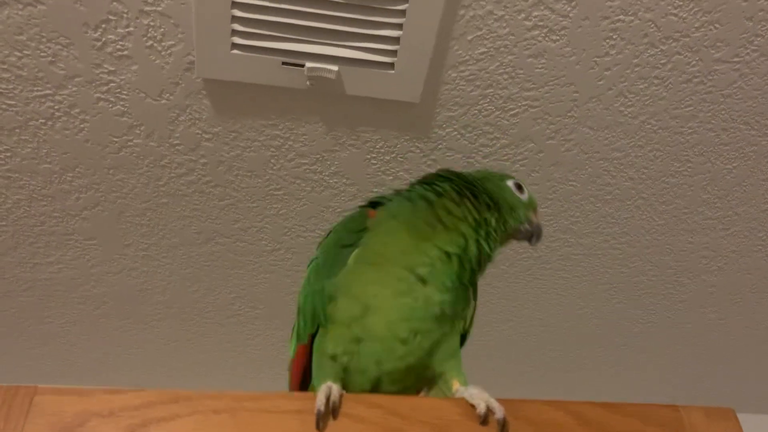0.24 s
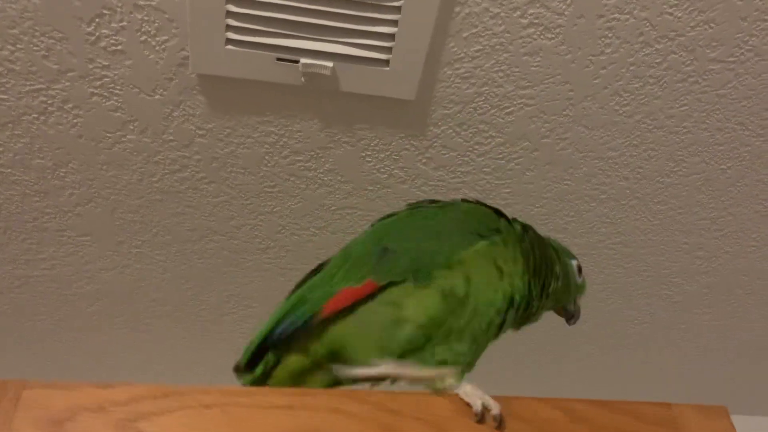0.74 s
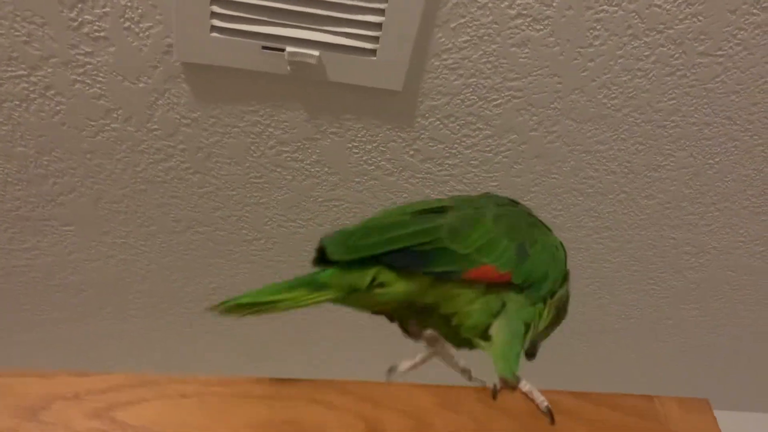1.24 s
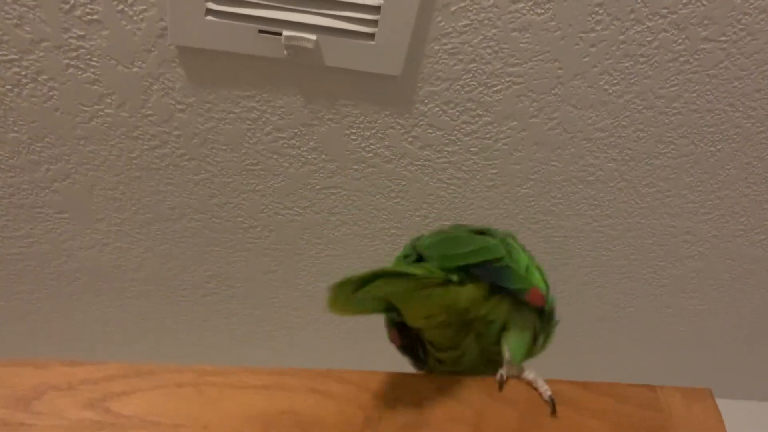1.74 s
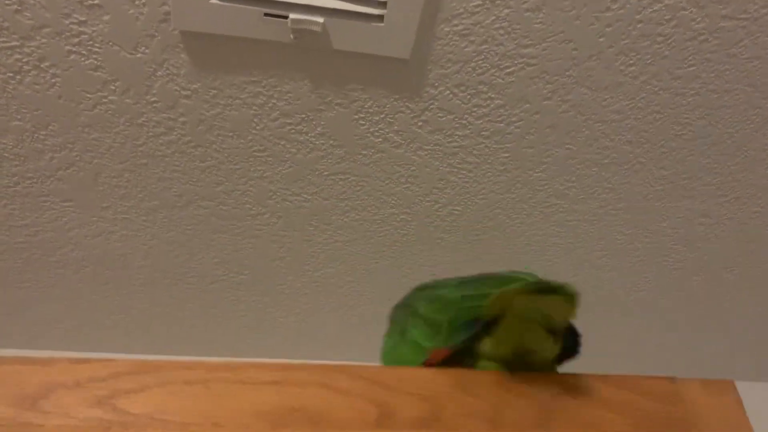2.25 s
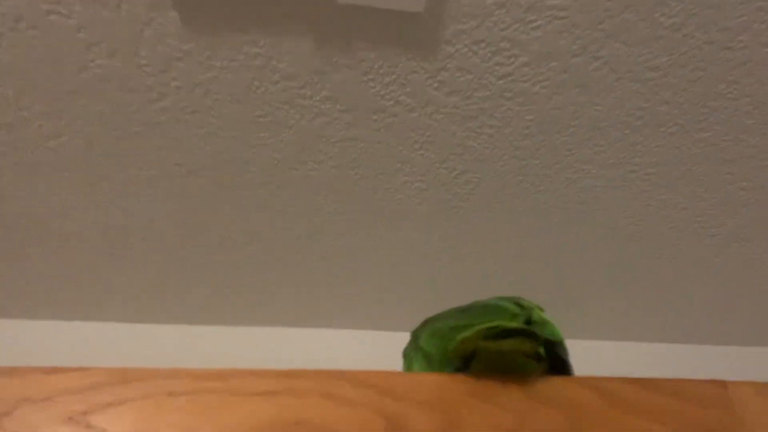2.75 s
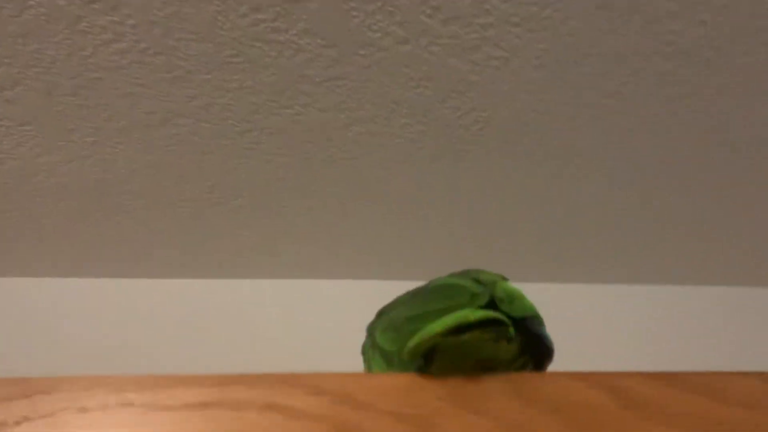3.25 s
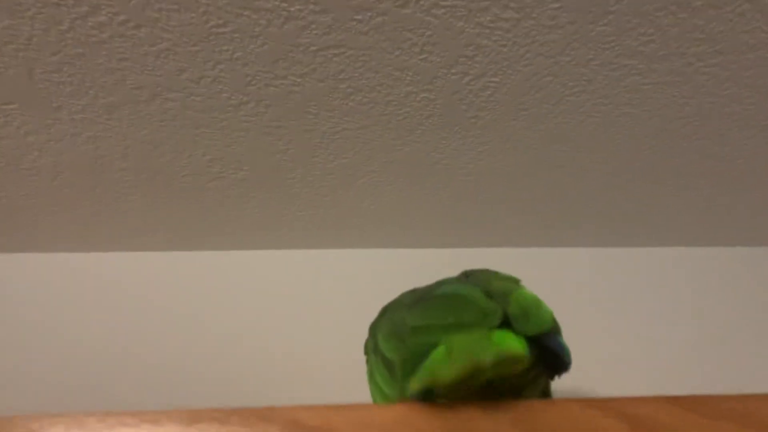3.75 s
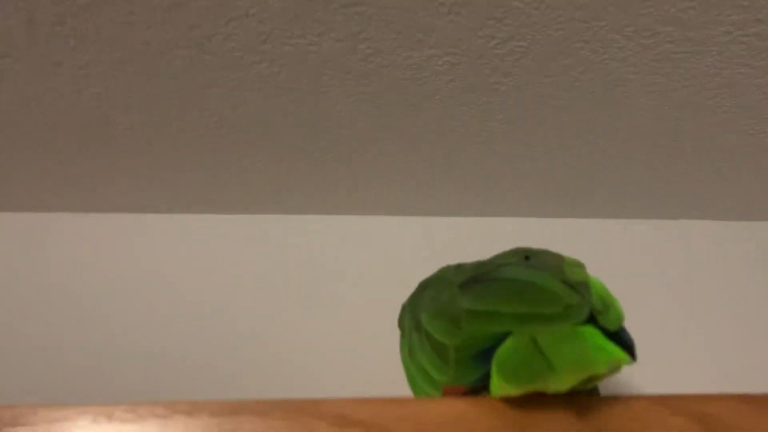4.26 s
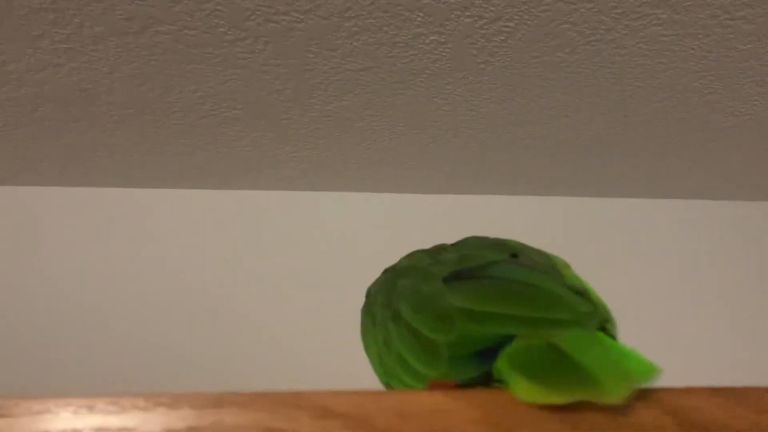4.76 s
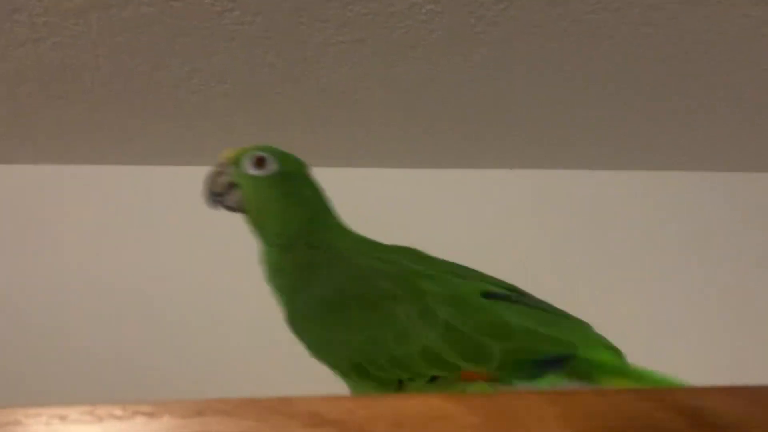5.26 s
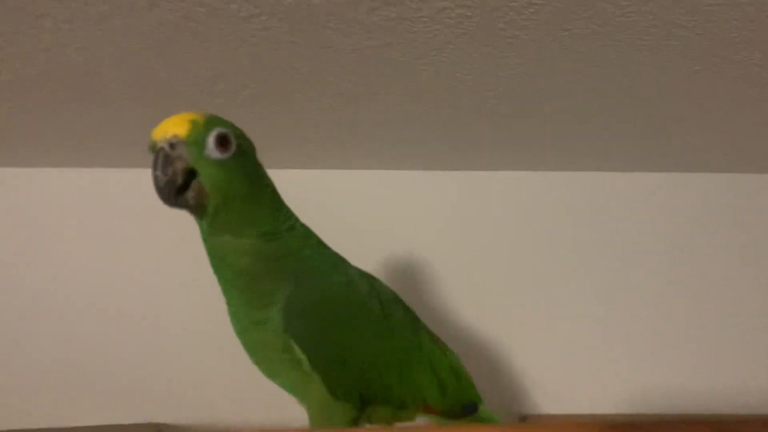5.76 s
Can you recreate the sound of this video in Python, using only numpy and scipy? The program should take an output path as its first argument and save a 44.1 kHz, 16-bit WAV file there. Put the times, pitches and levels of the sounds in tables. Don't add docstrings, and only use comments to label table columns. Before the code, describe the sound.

A low, steady electrical hum and faint airy hiss fill a small quiet room, heard through a close stereo microphone. From 0 to 0.9 s there are only a faint tap and soft feather shifts from a parrot on a wooden ledge. Around 1.0 to 1.3 s come crisp, thin claw clicks with a soft low bump, then light steps and scrapes near 1.5 to 2.0 s. A brighter cluster of ticks falls at 2.2 to 2.6 s. A small knock sounds at 2.94 s, fainter taps follow, a light scuff at 3.5 s, then a clearer hollow double knock at 3.74 s. Things stay nearly still until 4.6 s, when a tap and scrape begin a vigorous turn. From 4.8 to 6.0 s, feathers rustle roughly and continuously, with low thumps, sharp claw clacks near 5.2 and 5.37 s, and a hard tap at 5.55 s; the rustling continues to the end.

```python
import sys
import numpy as np
from scipy import signal
from scipy.fft import rfft, irfft, next_fast_len
from scipy.io import wavfile
from scipy.ndimage import map_coordinates

SR = 44100
rng = np.random.default_rng(int(sys.argv[2]) if len(sys.argv) > 2 else 0)


def inscribe(sig):
    pcm = np.round(np.clip(np.atleast_2d(sig).T, -1, 1) * 32767)
    wavfile.write(sys.argv[1], SR, pcm.astype(np.int16))


def decibels_to_gain(level_db):
    exponent = np.asarray(level_db, float) / 20
    return 10 ** exponent


N = 265658
FFT_LENGTH = next_fast_len(N)
BIN_HZ = np.maximum(np.fft.rfftfreq(FFT_LENGTH, 1 / SR), 1)

# [harmonic_number, level_db]
HUM = [(1, -51.5), (2, -57.5), (3, -67), (4, -82.5), (5, -79), (6, -78), (8, -96.5)]
# [time_s, level_db]
HUM_SWELL = [(0, -1.5), (.6, -2.5), (1.2, -2), (2.1, -1), (2.6, -3), (3.3, -1), (3.9, -2.5), (4.2, -3.5),
             (4.7, -1), (6.02, 1.5)]

AIR = [(25, -100), (45, -92), (80, -83.5), (160, -90.5), (300, -100), (500, -109), (1000, -117),
       (2000, -121), (4000, -126), (7000, -127), (10000, -124), (13000, -124), (15650, -124), (15850, -150)]
RUMBLE = [(20, -45), (36, 2.5), (70, 5.5), (100, 0), (160, -10.5), (260, -21), (400, -35)]
BODY = [(120, -5), (220, -2), (450, -4.5), (900, -11.5), (1300, -18)]
FEATHERS = [(600, -33), (1000, 0.5), (2500, 1), (4000, -4.5), (7600, -11.5), (8300, -33)]
SHEEN = [(7000, -30), (7700, -7), (8700, 0), (10000, -3), (11200, -4.5), (14000, 1), (15650, -3),
         (15850, -40)]
LOW_TICK = [(700, -28), (1100, -13), (1500, -11.5), (2500, -7.5), (3200, -22)]
MID_TICK = [(1900, -27), (2600, 0.5), (4500, -0.5), (7600, -4), (8600, 5)]
HIGH_TICK = [(6800, -30), (7800, -5), (9000, 0), (11000, -2), (14000, 0), (15600, -5), (16000, -22),
             (16700, -32)]

# [centre_s, length_s, level_db, brightness_db]
SHIFTS = [(0.113, 0.075, -81, -0.5), (0.342, 0.049, -78.5, -2.5), (0.647, 0.39, -86.5, 0),
          (0.71, 0.023, -78, -1), (0.87, 0.2, -78.5, 7), (0.917, 0.046, -72, 0.5), (1.11, 0.36, -78, -4),
          (1.28, 0.036, -88, 3), (1.652, 0.12, -79, -3.5), (1.743, 0.19, -88.5, -7.5),
          (1.983, 0.14, -75.5, 1.5), (2.044, 0.15, -80.5, -4.5), (2.396, 0.086, -80.5, -3),
          (2.548, 0.071, -77, 5), (2.884, 0.31, -86, -2), (3.006, 0.12, -90.5, -18),
          (3.23, 0.16, -87.5, -14), (3.38, .1, -90, 8), (3.498, 0.12, -73.5, 0), (3.825, 0.17, -74.5, -3),
          (4.003, 0.057, -80, -1), (4.066, 0.04, -86, -11), (4.164, 0.23, -83.5, 0), (4.26, 0.09, -91, -14)]
# [time_s, level_db, brightness_db]
SWING = [(4.54, -85.5, 1), (4.63, -73.5, 0), (4.7, -64.5, -2.5), (4.78, -60, -8), (4.85, -58, -8.5),
         (4.89, -59.5, -3), (4.93, -59.5, -7), (5.0, -59, 1), (5.12, -57.5, -2), (5.25, -55.5, -0.5),
         (5.34, -62.5, 0.5), (5.45, -59.5, -0.5), (5.53, -59.5, -3), (5.62, -58, 0), (5.7, -61, 6),
         (5.77, -62.5, 2), (5.82, -57.5, 1.5), (5.88, -64, 3), (5.93, -56.5, 6.5), (5.99, -61.5, 2),
         (6.02, -57.5, 4)]
SWING_MEAN_DB = -59
# [centre_s, length_s, level_db]
THUMPS = [(.97, 0.16, -60), (1.13, 0.2, -55), (2.0, 0.12, -60), (2.8, 0.14, -63), (4.3, 0.27, -70),
          (4.84, 0.12, -50.5), (4.97, 0.037, -45.5), (5.1, 0.11, -47.5), (5.16, 0.032, -40),
          (5.22, 0.022, -37.5), (5.36, 0.14, -45), (5.42, 0.017, -43.5), (5.55, 0.024, -73),
          (5.68, 0.027, -70), (5.81, 0.1, -46.5), (5.865, 0.053, -40.5), (6.02, 0.067, -46)]

# [start_s, level_db, wood_db]
CLICKS = [(.9872, -50, 5.5), (1.1588, -58.5, 12), (1.1782, -45.5, 5.5), (1.2078, -40.5, 1.5),
          (1.2543, -53, 7), (2.247, -50, 1), (2.7162, -62.5, -2), (3.379, -73, 16), (3.4907, -52.5, -9),
          (3.5074, -59, -8), (3.5634, -78, 4), (3.9043, -63, -19), (4.0573, -67, -1), (4.332, -67, -15.5),
          (4.878, -72, -4), (5.1975, -42, -9), (5.3688, -43, 1), (5.9505, -50, 0), (1.9875, -73, 3),
          (2.2315, -45, 0), (5.5486, -33, 11)]
# [start_s, level_db, wood_db]
STEPS = [(1.5095, -59.5, 9.5), (1.6025, -63, 7.5), (1.717, -78, 11), (1.8673, -72.5, 7), (1.9415, -69.5, 2),
         (1.951, -72, 1), (1.9714, -78, 17), (1.9866, -62, 7), (2.2103, -46.5, 3), (2.231, -45, 2.5),
         (2.5386, -55.5, 1), (3.4106, -58, 5), (3.5763, -69.5, 10), (3.8283, -66.5, 6.5),
         (4.229, -72.5, -3), (4.9478, -44.5, 4), (5.1744, -39, 5.5), (5.199, -40, 1), (5.313, -57, 13),
         (5.3465, -53, 3), (5.3661, -37.5, 3), (5.5814, -48, 10), (5.6354, -37.5, 0.5), (5.9186, -47, 2.5),
         (5.9504, -41.5, -1)]
# [start_s, level_db, dullness_db]
SCRAPES = [(.1999, -73, -11), (1.2294, -61, 1), (1.5584, -61.5, 5), (2.248, -52, -2), (2.27, -61, -5),
           (1.525, -66, 6), (2.425, -71, -5), (2.4454, -76, -2), (2.5604, -59.5, -3), (2.582, -64, -3),
           (3.4297, -60, 14.5), (3.4544, -81, 8), (4.1554, -67.5, -2), (4.6044, -57, 2.5),
           (4.631, -57.5, 5.5), (4.718, -63, 18), (5.558, -49, -3), (5.575, -57, -2), (5.71, -52, -7),
           (5.745, -60, -6), (5.895, -65, -11)]
# [start_s, level_db, edge_db]
TAPS = [
    (.057, -59, -0.5),
    (1.6502, -54.5, -9),
    (2.9382, -71, 10),
    (3.1513, -74, 2),
    (3.7336, -52, -9),
    (3.931, -68, -18),
    (3.969, -84, -3),
    (4.058, -73, 4),
    (4.6857, -51.5, 0),
    (5.5488, -41, -7),
]
# [start_s, level_db, wood_db]
BRUSHES = [
    (1.0645, -67, -9),
    (1.1153, -68, -7),
    (2.12, -71, 3),
    (2.409, -61.5, -1),
    (2.428, -76.5, 14),
    (3.21, -69.5, 2),
    (5.79, -66, 5),
]
# [events, (low_db, mid_db, bright_db, length_ms), how the events' last column moves each band]
CONTACTS = [
    (CLICKS, (-27.5, -14, 6.5, 1.88), (1, 1, 0)),
    (STEPS, (-11.5, -6, 3.5, 4.5), (1, 1, 0)),
    (SCRAPES, (-9.5, -1.5, -9, 5), (1, 0, -1)),
    (TAPS, (0, -5, -15, 1.5), (0, 1, 1)),
    (BRUSHES, (-51, -10.5, 3.5, 15.5), (1, 1, 0)),
]

# [start_s, peak_db, pitch_hz]
PINGS = [(.316, -56, 2410), (0.346, -63.5, 2370), (.589, -75, 2360), (.93, -75, 3640), (1.0, -72, 3540),
         (1.001, -64, 1230), (1.02, -59.5, 410), (1.115, -68.5, 6510), (1.27, -69, 2340),
         (1.339, -69.5, 2780), (1.431, -75, 2210), (1.555, -68.5, 1270), (1.657, -65.5, 1385),
         (1.952, -61.5, 14700), (1.965, -78, 15000), (1.974, -77, 15200), (1.987, -72, 15000),
         (1.99, -67.5, 3520), (1.99, -68, 4600), (1.558, -63, 2840), (1.605, -72, 4820), (2.42, -80, 3500),
         (2.43, -70, 4820), (2.49, -77, 3100), (2.54, -73, 1660), (2.545, -74, 1380), (2.555, -72, 850),
         (2.12, -62, 14650), (2.79, -67, 1810), (3.306, -67.5, 2700), (3.493, -60, 9040),
         (2.412, -54, 9070), (2.425, -73, 13800), (2.54, -58, 8660), (3.49, -72, 14000), (3.79, -63, 2410),
         (4.655, -68, 14100), (4.72, -65, 14000), (4.78, -60, 13900), (4.87, -63, 14100),
         (3.831, -73, 2470), (4.505, -67, 2573), (4.692, -52.5, 1155), (5.71, -58.5, 1300),
         (5.71, -54.5, 560), (4.695, -51, 1960), (5.368, -51, 2580), (5.643, -51.5, 2500),
         (5.827, -56, 2720), (5.918, -48, 507)]
# [start_s, peak_db, pitch_hz]
SNAPS = [(.987, -58, 3580), (1.515, -61.5, 4770), (1.56, -68, 4400), (1.99, -56, 7850), (1.99, -57, 10950),
         (5.16, -49, 1940), (5.592, -48, 6160), (.987, -57, 7070), (1.158, -66, 6300), (1.18, -62, 6400),
         (1.18, -63, 3700), (1.208, -61.5, 4880), (2.938, -71, 1100), (2.982, -68, 3170),
         (3.035, -73, 1100), (3.095, -75, 1050), (3.15, -64, 1080), (3.181, -62.5, 1120), (3.22, -68, 1060),
         (3.249, -70, 1100), (4.059, -66.5, 1110), (4.2, -66.5, 7700), (4.23, -67, 1410),
         (4.232, -70.5, 6760), (4.332, -75, 7300), (4.683, -51, 1870), (4.688, -47.5, 1870),
         (5.368, -44.5, 4180), (5.549, -45, 1350), (5.549, -44.5, 1090), (5.56, -47, 1130),
         (4.949, -59, 10200), (5.919, -52, 11400), (3.736, -55, 950), (3.734, -65, 2330),
         (1.525, -65, 2770), (1.535, -66, 3600), (1.575, -69, 2700), (1.59, -65, 2800), (2.94, -61, 500),
         (2.95, -68, 800), (2.212, -54, 11000), (2.232, -56, 10400), (2.247, -67, 11000),
         (2.716, -71, 13300), (3.733, -50, 1200), (3.734, -53.5, 1720), (3.816, -68, 2350),
         (3.931, -65.5, 2160), (5.175, -31, 13900), (5.198, -46, 14800), (5.312, -46, 13400),
         (5.312, -52, 8700), (5.312, -60, 6900), (5.369, -38, 14400), (5.369, -44, 10100),
         (5.4, -41, 14400), (5.555, -38.5, 10850), (5.638, -48, 10500), (5.809, -75, 1120),
         (5.81, -53.5, 10200), (5.919, -59, 1300), (5.951, -49, 12600), (5.951, -48.5, 7100),
         (6.008, -72, 1390)]
# [start_s, peak_db, pitch_hz]
SLIPS = [(0.058, -75.5, 5650), (.403, -70.5, 1494), (.516, -72.5, 3520), (.6, -75, 3700), (.745, -79, 2720),
         (.79, -74, 3580), (0.829, -70.5, 2450), (.87, -71.5, 3590), (.704, -67.5, 2290),
         (0.792, -74, 2680), (0.839, -72, 3700), (1.07, -73, 3560), (1.17, -62, 585), (1.2, -63, 614),
         (1.21, -60.5, 3630), (1.509, -60.5, 2800), (1.516, -68, 4490), (2.26, -62, 3300),
         (2.933, -73, 3200), (3.03, -78, 2150), (4.03, -81, 2370), (3.533, -68, 2780), (3.819, -68, 2240),
         (3.971, -70, 2400), (4.69, -66, 5670), (4.724, -63, 5800), (4.709, -63, 4700)]
# [events, t60_s, width_hz, kick]
RINGS = [(PINGS, 0.16, 121, 1.326), (SNAPS, 0.02, 280, 1.287), (SLIPS, 0.28, 163, 1.287)]

# [start_s, peak_db, hardness (1 = hard)]
KNOCKS = [(.93, -60, 0.12), (1.039, -58, 0.13), (1.175, -51, 0), (1.52, -66, 0), (2.938, -50, 1.1),
          (3.029, -74, 1), (3.15, -73, 1.1), (3.249, -63.5, 1.3), (3.282, -61, 1.05), (3.737, -40.5, 0.99),
          (3.766, -44, 0.91)]
# [pitch_hz, level_db, t60_s]
LEDGE = [(93.8, 3, 0.22), (131.8, -1, 0.21), (182, -9, 0.19), (227, -4.5, 0.18), (274, -16.5, 0.31),
         (320, -12, 0.17), (410, -14, 0.22), (515, -17, 0.15), (617, -17.5, 0.1), (770, -21, 0.12),
         (915, -26, 0.15), (1045, -24, 0.21), (1270, -23, 0.069), (1650, -28, 0.048)]

# [pitch_hz, correlation]
LIKENESS = [(60, .95), (150, .9), (250, .8), (500, .4), (1000, .2), (2500, -.05), (6000, .2), (7100, .55),
            (7800, .99), (16000, .997)]
# [pitch_hz, left_minus_right_db]
LEAN = [(60, .6), (150, -.4), (300, .5), (1000, .4), (2500, -.8), (4500, -3), (6100, -3.5), (7000, -1),
        (7700, 0)]
# [pitch_hz, left_lag_rad]
TURN = [(5500, 0), (6900, .45), (7700, 2.68), (9150, 3.42), (10350, 6.15), (11600, 6.4), (12700, 9.15),
        (13850, 9.68), (15250, 12.45), (16200, 12.57)]


def at_bins(points):
    hz, values = np.transpose(points)
    return np.interp(np.log(BIN_HZ), np.log(hz), values)


def in_time(rows):
    s, *columns = np.transpose(rows)
    return [np.interp(np.arange(N) / SR, s, c) for c in columns]


def colour(x, spectrum, unit=True):
    inside = (BIN_HZ > spectrum[0][0]) * (BIN_HZ < spectrum[-1][0])
    gain = decibels_to_gain(at_bins(spectrum)) * inside
    scale = 1 / np.sqrt(np.mean(gain ** 2)) if unit else np.sqrt(SR / 2)
    return irfft(rfft(x, FFT_LENGTH) * gain * scale, FFT_LENGTH)[:, :N]


def noise():
    return rng.standard_normal((2, N))


def drift(rate_hz):
    r = np.exp(-2 * np.pi * rate_hz / SR)
    slow = signal.lfilter([1], [1, -2 * r, r * r], rng.standard_normal(N + SR))[SR:]
    return slow / slow.std()


def dying(clicks, t60_s):
    return signal.lfilter([1], [1, -decibels_to_gain(-60 / (t60_s * SR))], clicks + 1e-18)


def chance_field(hz, s, wide_hz, long_s):
    grid = np.meshgrid(hz / wide_hz, s / long_s, indexing="ij")
    field = map_coordinates(rng.standard_normal((400, 800)), grid, order=1, mode="wrap")
    return field / field.std()


def patches(x, patchy_db, wide_hz, long_s):
    hz, s, cells = signal.stft(x, SR, nperseg=512)
    depth_db = patchy_db / (1 + (hz[:, None] / 11000) ** 2)
    gain = decibels_to_gain(depth_db * chance_field(hz, s, wide_hz, long_s))
    return signal.istft(cells * gain / np.sqrt(np.mean(gain ** 2)), SR)[1][:, :N]


def swells(events, rest_db):
    t, power = np.arange(N) / SR, decibels_to_gain(2 * rest_db)
    for s, length_s, db in events:
        power = power + decibels_to_gain(2 * db) * np.exp(-(2 * (t - s) / length_s) ** 2)
    return 10 * np.log10(power)


def with_swing(quiet_db, mean_db, share):
    swing_db = mean_db + share * (in_time(SWING)[0] - SWING_MEAN_DB)
    return 10 * np.log10(decibels_to_gain(2 * quiet_db) + decibels_to_gain(2 * swing_db))


def hum():
    mains_hz, skew_rad = 59.98, 0.12
    cycle = 2 * np.pi * mains_hz * np.arange(N) / SR - 1.05
    wave = np.zeros(N)
    for k, db in HUM:
        level = np.sqrt(2) * decibels_to_gain(db + 0.95 * k ** 0.76 * drift(2.8))
        wave += level * np.cos(k * cycle + skew_rad * (k * k - 1))
    return wave * decibels_to_gain(in_time(HUM_SWELL)[0])


def stirring():
    lumps = drift(7.0)
    body_db = swells([(s, n, db + 7 - bright_db) for s, n, db, bright_db in SHIFTS], rest_db=-88.5)
    feathers_db = swells([(s, n, db) for s, n, db, _ in SHIFTS], rest_db=-100)
    sheen_db = swells([(s, n, db - 0.5 + bright_db) for s, n, db, bright_db in SHIFTS], rest_db=-96)
    layers = [
        (with_swing(body_db, -56.5, 0.98), BODY),
        (with_swing(feathers_db, SWING_MEAN_DB, 1), FEATHERS),
        (with_swing(sheen_db, -60 + in_time(SWING)[1], 1), SHEEN),
    ]
    rub = colour(noise(), AIR, unit=False)
    for db, spectrum in layers:
        grain_db = 0.7 * lumps + 1.5 * drift(70)
        rub += colour(noise() * decibels_to_gain(db - 3.0 + grain_db), spectrum)
    shake_db = with_swing(swells(THUMPS, rest_db=-73), -54.5, 0.93) + 0.5
    shake = colour(noise() * decibels_to_gain(shake_db), RUMBLE)
    return patches(rub, patchy_db=3.0, wide_hz=202.8, long_s=0.05) + shake


def ticks():
    room_t60_s, room_db = 0.23, -7.5
    out, t = np.zeros((2, N)), np.arange(SR // 12) / SR
    crackle = decibels_to_gain(1.2 * drift(640))
    # spectrum, share of the room's t60, tail dB
    bands = [(LOW_TICK, 1.1, 3.5), (MID_TICK, 0.9, -2.5), (HIGH_TICK, 0.42, -13.0)]
    for k, (spectrum, share, tail_db) in enumerate(bands):
        burst = np.zeros(N + len(t))
        for events, (*band_db, length_ms), lean in CONTACTS:
            u = t / (length_ms / 1800)
            pulse = u * np.exp(1 - u)
            for s, db, tilt_db in events:
                level_db = db + band_db[k] + lean[k] * tilt_db - 7.0
                burst[round(s * SR):][:len(t)] += decibels_to_gain(level_db) * pulse
        power = burst[:N] ** 2
        tail = dying(power, room_t60_s * share / 2) * decibels_to_gain(2 * room_db + tail_db) / (0.0013 * SR)
        out += colour(noise() * np.sqrt(power * crackle ** 2 + tail), spectrum)
    return patches(out, patchy_db=3.0, wide_hz=149.3, long_s=0.069)


def pings():
    out, t = np.zeros((2, N + SR)), np.arange(SR // 3) / SR
    for events, t60_s, width_hz, kick in RINGS:
        for s, peak_db, hz in events:
            r = np.exp(-np.pi * width_hz * (1 + (hz / 8000) ** 2) / SR)
            poles = [1, -2 * r * np.cos(2 * np.pi * hz / SR), r * r]
            rung = rng.standard_normal((2, len(t))) * decibels_to_gain(-60 * t / t60_s)
            rung[0, 0] = kick / np.sqrt(1 - r)
            for _ in range(2):
                rung = signal.lfilter([1 - r * r, 0, r * r - 1], poles, rung)
            out[:, round(s * SR):][:, :len(t)] += decibels_to_gain(peak_db + 2.5) * rung / np.abs(rung[0]).max()
    return out[:, :N]


def knocks():
    out, t = np.zeros((2, N + SR)), np.arange(SR // 3) / SR
    for s, db, hardness in KNOCKS:
        for hz, mode_db, t60_s in LEDGE:
            u = t / (0.013 * (90 / hz) ** 0.41)
            push = rng.standard_normal((2, len(t))) * u * np.exp(1 - u)
            r, w = decibels_to_gain(-60 / (t60_s * SR)), 2 * np.pi * hz / SR
            rung = signal.lfilter([1, 0, -1], [1, -2 * r * np.cos(w), r * r], push)
            peak = np.abs(rung).max(axis=1, keepdims=True)
            softness_db = 8.0 * (1 - hardness) * np.log2(hz / 90)
            out[:, round(s * SR):][:, :len(t)] += rung / peak * decibels_to_gain(db + mode_db - softness_db)
    top = signal.butter(3, 2600, fs=SR, output="sos")
    return signal.sosfilt(top, out[:, :N])


def turned(ports):
    hz, s, cells = signal.stft(ports, SR, nperseg=512)
    moved_hz = hz[:, None] + 280 * chance_field(hz, s, wide_hz=900, long_s=0.045)
    turn = np.exp(-0.5j * np.interp(moved_hz, *np.transpose(TURN)))
    return signal.istft(cells * [turn, 1 / turn], SR)[1][:, :N]


def scene():
    paths = stirring() + ticks() + pings() + knocks()
    paths[0] += hum()
    shared, differing = rfft(paths, FFT_LENGTH)
    alike, lean = at_bins(LIKENESS), decibels_to_gain(at_bins(LEAN) / 2)
    shared = shared * np.sqrt((1 + alike) / 2)
    differing = differing * np.sqrt((1 - alike) / 2)
    left = (shared + differing) * lean
    right = (shared - differing) / lean
    return turned(irfft(np.array([left, right]), FFT_LENGTH)[:, :N])


def band_limit(x):
    return signal.sosfilt(signal.butter(12, 16830, fs=SR, output="sos"), x)


def record(dry):
    cut = signal.cheby2(8, 40, 16900, fs=SR, output="sos")
    mix = signal.sosfilt(cut, dry)
    return band_limit(mix)


dry = scene()
out = record(dry)
inscribe(out)
```